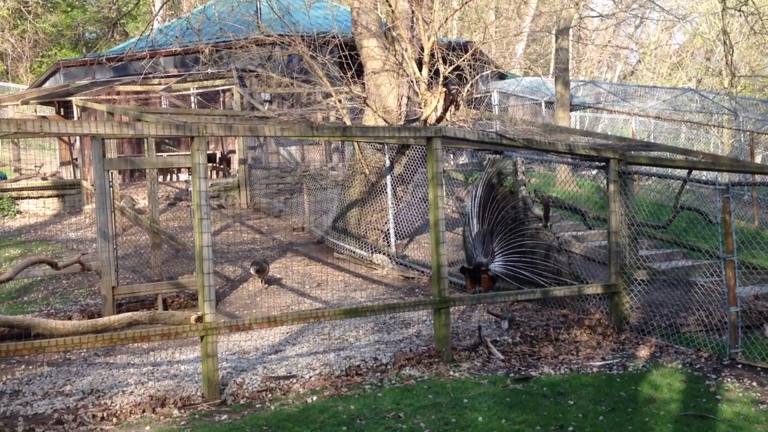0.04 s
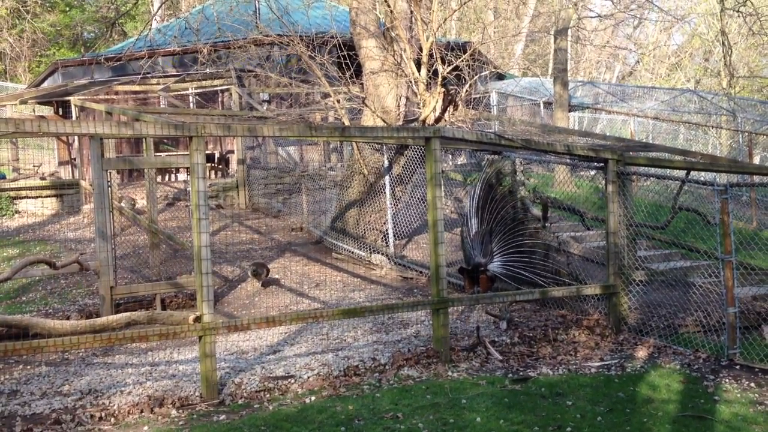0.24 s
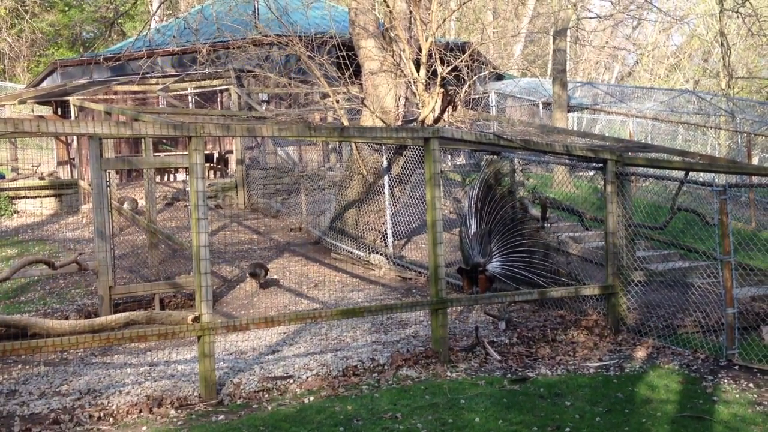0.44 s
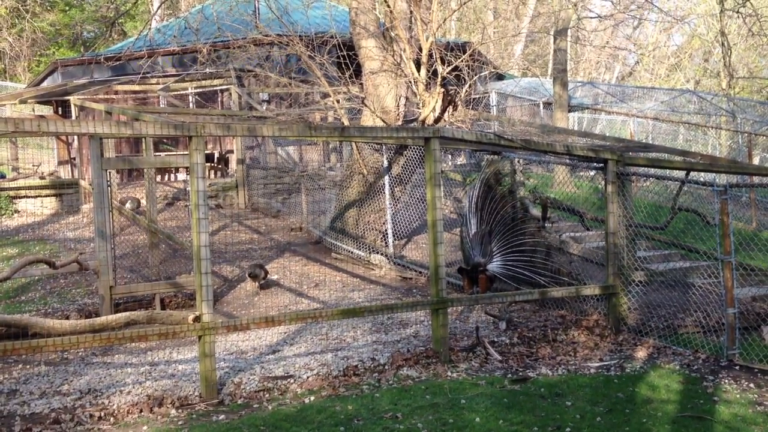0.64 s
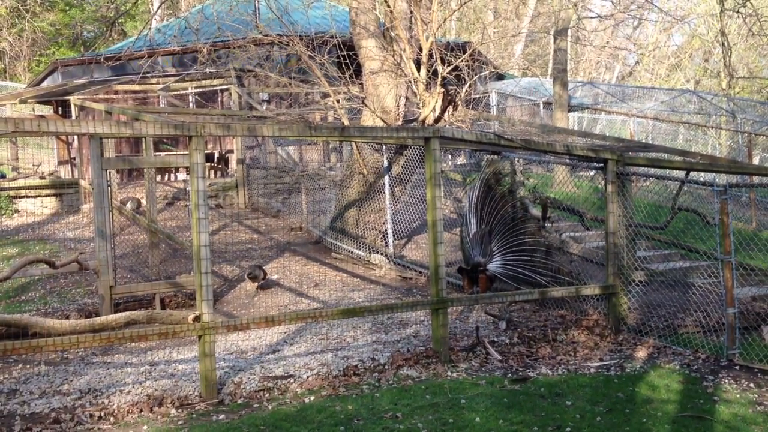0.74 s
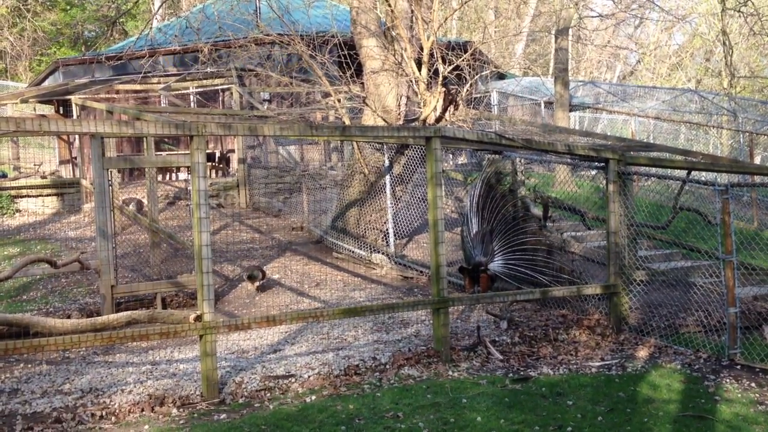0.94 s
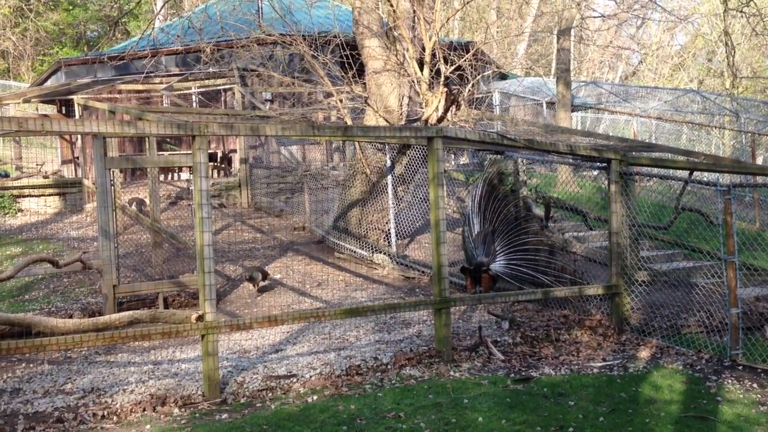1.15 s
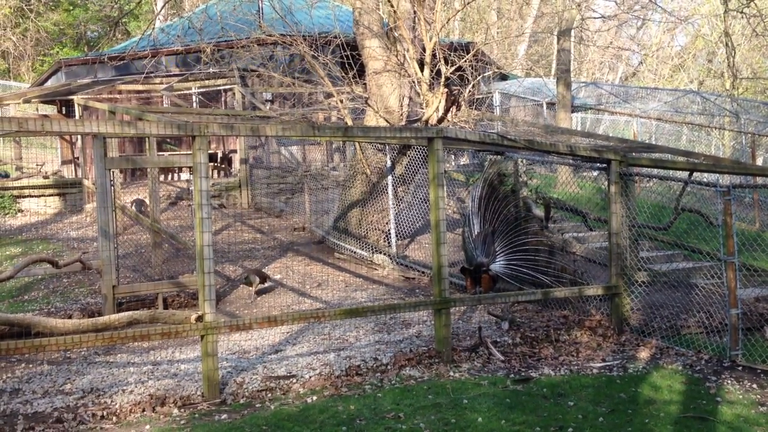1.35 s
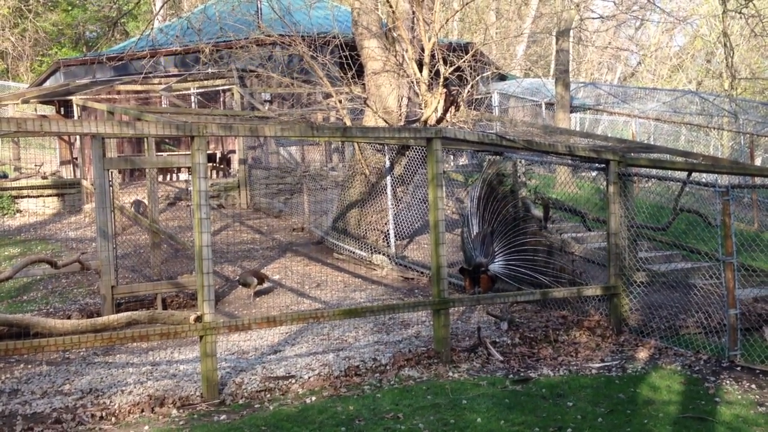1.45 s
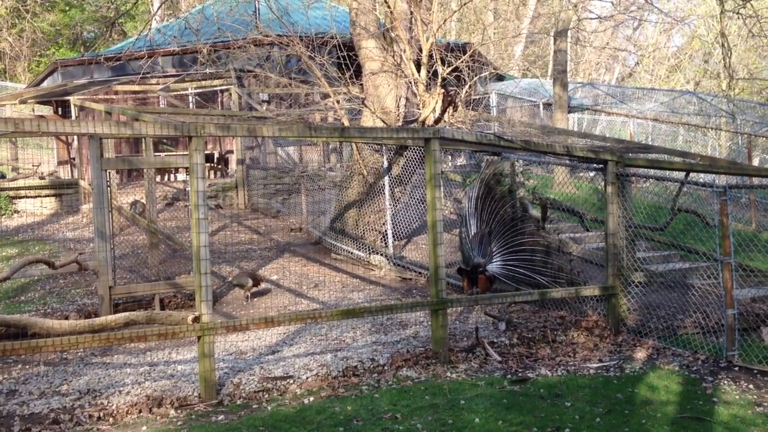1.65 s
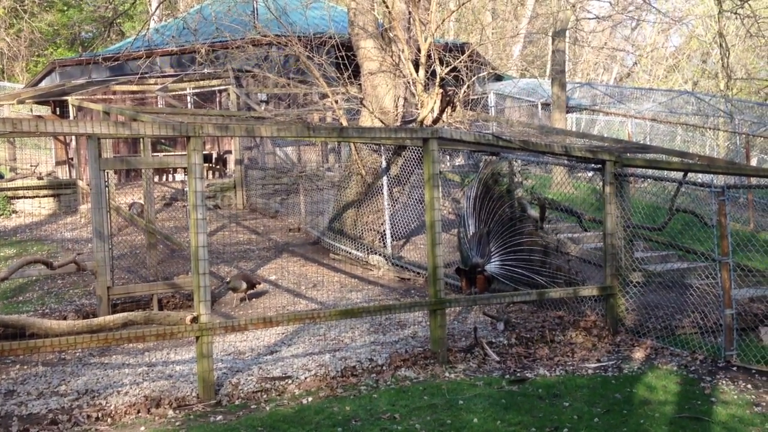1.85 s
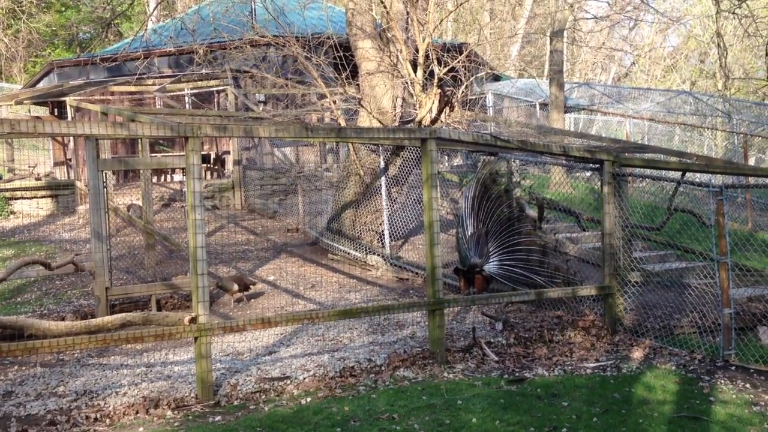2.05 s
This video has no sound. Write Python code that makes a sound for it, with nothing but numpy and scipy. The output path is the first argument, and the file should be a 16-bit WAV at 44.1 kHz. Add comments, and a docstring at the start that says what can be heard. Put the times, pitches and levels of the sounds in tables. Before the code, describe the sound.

A peacock gives one loud, close call while small birds chirp faintly outdoors.

```python
"""An outdoor aviary, one microphone close to a peacock. He gives one loud call: four short croaks,
the first and last faint, a stuttering, raspy rise, then a clear held note that sags and fades, its
harmonics shaped by throat and beak. Farther off, small birds chirp faintly, with a dull tail from
sheds and trees. A soft bump and a few dry ticks sit over the quiet background."""
import sys
import numpy as np
from scipy import signal
from scipy.fft import rfft, irfft
from scipy.io import wavfile
from scipy.ndimage import uniform_filter1d, minimum_filter1d

SR = 44100
rng = np.random.default_rng(int(sys.argv[2]) if len(sys.argv) > 2 else 0)


def wrap_up_sound(samples):
    """Save the sound to the file named by the first command line argument, as 16-bit audio."""
    columns = np.atleast_2d(samples).T
    # keep every value between -1 and 1, then stretch to whole-number steps
    tamed = np.clip(columns, -1, 1)
    steps = np.round(tamed * 32767).astype(np.int16)
    wavfile.write(sys.argv[1], SR, steps)


N = 92786
T = np.arange(N) / SR

# outdoor background: frequency_hz, density_db
BACKGROUND_SPECTRUM = [(25, -34), (45, -27), (70, -10), (120, -2), (180, 0), (260, -3), (400, -7),
                       (700, -7.5), (1100, -11), (1500, -15.5), (2100, -18), (3200, -21), (4600, -19.5),
                       (5600, -25), (7200, -34), (10000, -39), (15000, -34)]
# small birds: start_s, length_s, start_hz, end_hz, level_db
CHIRPS = [(-.015, .075, 5230, 2770, -52), (.215, .045, 4320, 5240, -57), (0.284, .035, 3400, 4500, -59),
          (0.372, .03, 4200, 4730, -63), (.445, .025, 4200, 4700, -63), (0.826, .025, 3800, 5150, -51),
          (0.858, .045, 5180, 4220, -54), (.96, .095, 5100, 3000, -51), (0.989, .06, 4970, 3730, -57),
          (1.155, .04, 3920, 3400, -47), (1.214, .03, 4690, 3880, -49), (2.056, .05, 4507, 3495, -58)]
# a soft bump, then dry ticks: start_s, peak_db, centre_hz, width_hz, decay_s
TICKS = [(.122, -35, 175, 160, .006), (.742, -31.5, 2300, 2000, .0016), (.838, -46, 4800, 3500, .003),
         (.874, -37, 2070, 900, .002), (1.093, -39, 2000, 3200, .002)]
# one harsh falling chirp: time_s, pitch_hz, level_db
HARSH_CHIRP = [(.51, 5100, -66), (.538, 4900, -54), (.55, 4600, -45), (.585, 3900, -46.5),
               (.63, 3500, -43.5), (.66, 3400, -52), (.71, 3350, -64), (.76, 3350, -78)]
# hiss around it: frequency_hz, density_db
CHIRP_HISS = [(2000, -25), (3500, -3), (5200, 0), (6500, -7), (9000, -17), (15000, -22)]
# croaks before the voice catches on: start_s, length_s, level_db, pitch_hz
CROAKS = [(1.129, 0.011, -36.5, 1030), (1.1375, .011, -18, 1065), (1.155, 0.016, -23.5, 1133),
          (1.172, 0.0095, -39, 1053)]
# noise in the croaks: frequency_hz, density_db
CROAK_SPECTRUM = [(60, -38), (180, -9), (600, -9), (1100, 0), (1700, -16), (2500, -11), (3300, -33),
                  (7000, -40), (9500, -37), (14000, -35)]
# the call's rise and sag: time_s, pitch_hz
CALL_PITCH = [(1.175, 418), (1.215, 462), (1.24, 467.9), (1.262, 495), (1.3, 503.6), (1.335, 519.5),
              (1.41, 539), (1.485, 560.4), (1.55, 568.6), (1.62, 570.5), (1.7, 567.5), (1.77, 554),
              (1.825, 525.3), (1.885, 467.4), (1.945, 420)]
# effort behind the call: time_s, gain_db
CALL_EFFORT = [(1.175, -41), (1.182, -22), (1.19, -14), (1.202, -14), (1.215, -7), (1.24, -11), (1.26, -4),
               (1.33, -2.5), (1.42, -1), (1.62, -.5), (1.77, -1.5), (1.82, -5.3), (1.85, -10.5),
               (1.89, -18.5), (1.919, -25), (1.95, -45)]
# treble against the rest of the voice: time_s, gain_db
CALL_TREBLE = [(1.18, -23), (1.26, -17), (1.33, -10), (1.41, -10), (1.5, -2.5), (1.6, -1), (1.76, 0),
               (1.83, -7), (1.9, 0)]
# rasp against the voice: time_s, gain_db
HOARSENESS = [(1.17, -15), (1.21, -22), (1.27, -22), (1.33, -27), (1.4, -30), (1.47, -39), (1.6, -44),
              (1.8, -43), (1.93, -30)]
# catches in the rising voice: time_s, depth_db
CATCHES = [(1.197, 11), (1.208, 6), (1.224, 16), (1.252, 20.5), (1.281, 20), (1.318, 13.5), (1.353, 6),
           (1.391, 4)]
# throat and beak resonances: frequency_hz, gain_db
THROAT = [(400, 2.5), (570, 0), (850, -6), (950, -0.5), (1130, 2), (1300, -9), (1480, -8), (1600, -16),
          (1710, -16.5), (1850, -33), (2080, -18), (2280, -20), (2420, -14), (2630, -13), (2850, -22.5),
          (3100, -39), (3250, -29), (3400, -20), (3700, -27), (4000, -29), (4560, -36), (5130, -21),
          (5700, -9.5), (6270, -8.5), (6840, -22), (7900, -30), (9100, -25), (9700, -29), (10400, -42),
          (11400, -29), (12500, -28), (13100, -38), (13700, -31), (15000, -48)]
# faint tones between the harmonics: frequency_hz, gain_db
UNDERTONES = [(235, -35), (290, -51), (850, -49), (1400, -45), (2000, -58), (2550, -43), (3100, -58)]
# hoarse noise: frequency_hz, density_db
RASP_SPECTRUM = [(25, -52), (90, -48), (200, -15), (330, -26), (480, -6), (750, -7), (1100, 4.5),
                 (1400, -4), (1800, -21), (2300, 1), (2700, -2), (3150, -33), (5200, -38), (7500, -24),
                 (10500, -35), (12500, -29), (15000, -40)]
# air through the open beak: frequency_hz, density_db
BEAK_AIR = [(100, -45), (500, -22), (2000, -12), (3400, -4), (4500, -16), (5600, -0.5), (6500, 2),
            (7500, -14), (10500, -22), (12500, -16), (15000, -23)]
# low hum as the call dies: time_s, pitch_hz, level_db
HUM = [(1.8, 220, -72), (1.86, 231, -49), (1.93, 250, -47), (2.0, 260.7, -44), (2.04, 251, -68.5)]


def from_db(db):
    """Decibels to gain."""
    return 10 ** (np.asarray(db) / 20)


def unit_power(x):
    """Scale to an RMS of one."""
    return x / np.sqrt(np.mean(x ** 2) + 1e-20)


def in_time(rows):
    """Join the rows of a curve by straight lines."""
    times, *columns = np.transpose(rows)
    return [np.interp(T, times, column) for column in columns]


def during(rows):
    """Gate that is open for the length of a curve."""
    return uniform_filter1d(1. * ((T > rows[0][0]) & (T < rows[-1][0])), size=128)


def gain_at(spectrum, hz):
    """Read a spectrum as gain."""
    points_hz, db = np.transpose(spectrum)
    return from_db(np.interp(np.log(hz + 1e-9), np.log(points_hz), db))


def noise(spectrum):
    """Coloured noise of unit power."""
    colour = gain_at(spectrum, np.fft.rfftfreq(N, 1 / SR))
    return unit_power(irfft(rfft(rng.standard_normal(N)) * colour, N))


def drift(hz):
    """Smooth random wander of unit spread."""
    pole = np.exp(-32 * np.pi * hz / SR)
    slow = signal.lfilter([1], [1, -2 * pole, pole ** 2], rng.standard_normal(N // 16 + 1002))[1000:]
    return np.interp(np.arange(N) / 16, np.arange(len(slow)), unit_power(slow))


def background():
    """Quiet, steady outdoor noise, mostly low."""
    return from_db(-54) * noise(BACKGROUND_SPECTRUM)


def small_birds(bend=1.8, warble=.03):
    """Faint warbling glides, some way from the microphone."""
    out = 0
    for start_s, length_s, start_hz, end_hz, db in CHIRPS:
        progress = np.clip((T - start_s) / length_s, 0, 1)
        hz = (start_hz + (end_hz - start_hz) * progress ** bend) * (1 + warble * drift(400))
        out += from_db(db) * np.sin(np.pi * progress ** .6) * np.sin(2 * np.pi * np.cumsum(hz) / SR)
    return out


def yard(sound, t60_s=.52, cutoff_hz=4500):
    """Dull, diffuse tail from sheds and trees."""
    tail = rng.standard_normal(N) * from_db(-60 * T / t60_s) * (T > .012)
    tail = signal.sosfilt(signal.butter(1, cutoff_hz, fs=SR, output="sos"), tail)
    return signal.fftconvolve(sound, tail / np.sqrt(np.sum(tail ** 2)))[:N]


def bump_and_ticks():
    """Quickly dying noise bursts, each twice through one broad resonance."""
    out = 0
    for start_s, db, hz, width_hz, decay_s in TICKS:
        pole = np.exp(-np.pi * width_hz / SR)
        age = np.maximum(T - start_s, 0)
        ring = rng.standard_normal(N) * ((T > start_s) * np.exp(-age / decay_s) + 1e-12)
        for _ in range(2):
            ring = signal.lfilter([1, -1], [1, -2 * pole * np.cos(2 * np.pi * hz / SR), pole ** 2], ring)
        out += from_db(db) * ring / np.abs(ring).max()
    return out


def harsh_chirp(half_width_hz=560, hiss_db=-14):
    """A distant chirp so rough that it is a falling band of noise."""
    hz, db = in_time(HARSH_CHIRP)
    phase = 2 * np.pi * np.cumsum(hz) / SR
    lowpass = signal.butter(3, half_width_hz, fs=SR, output="sos")
    rough = unit_power(signal.sosfilt(lowpass, rng.standard_normal((2, N))))
    band = rough[0] * np.cos(phase) + rough[1] * np.sin(phase)
    return during(HARSH_CHIRP) * from_db(db) * (band + from_db(hiss_db) * noise(CHIRP_HISS))


def croaks(attack_s=.0015, rasp_db=-7):
    """Short hoarse bursts that ring the peacock's main throat resonance."""
    out, rasp = 0, from_db(rasp_db) * noise(CROAK_SPECTRUM)
    for start_s, length_s, db, hz in CROAKS:
        age = np.maximum(T - start_s, 0)
        envelope = (1 - np.exp(-age / attack_s)) * np.exp(-(age / length_s) ** 4)
        out += from_db(db) * envelope * (np.sin(2 * np.pi * hz * age) + rasp)
    return out


def throat_tones(hz, phase, treble_db, on, shelf_hz=4700, fade_from_s=1.825, fade_db_per_s=150):
    """Harmonics glide through fixed throat resonances, with faint undertones between them."""
    hz, phase, treble_db = hz[on], phase[on], treble_db[on]
    fade_db = fade_db_per_s * np.maximum(T[on] - fade_from_s, 0)  # overtones die first as the call sags
    tones = np.zeros(N)
    for k in range(1, 29):
        flicker_db = .9 * np.log(k) * drift(14)[on] * (k > 2)
        knee_db = 18 / (1 + (6.45 / k) ** 40)  # the source pulse is weak above the sixth harmonic
        shelf_db = treble_db / (1 + (shelf_hz / (k * hz)) ** 8)
        gain = gain_at(THROAT, k * hz) * from_db(flicker_db - knee_db - fade_db * (k > 3) + shelf_db)
        tones[on] += gain * np.cos(k * phase - k * k * np.pi / 8)
    for k in np.arange(6) + .5:
        gain = gain_at(UNDERTONES, k * hz) * from_db(3 * drift(9)[on])
        tones[on] += gain * np.cos(k * phase + drift(9)[on])
    return tones


def peacock_call(sag_per_db=.009, shimmer_db=.24):
    """Throat tones, with rasp and beak air pulsing each cycle; every catch dips pitch and level."""
    (hz,), (effort_db,) = in_time(CALL_PITCH), in_time(CALL_EFFORT)
    (treble_db,), (hoarse_db,) = in_time(CALL_TREBLE), in_time(HOARSENESS)
    loss_db, hoarse, voiced = voice_catches(), from_db(hoarse_db), during(CALL_EFFORT)
    jitter = .0025 * drift(70) + .08 * hoarse * drift(250)
    hz = uniform_filter1d(hz, size=800) * (1 - sag_per_db * loss_db + jitter)
    phase = 2 * np.pi * np.cumsum(hz) / SR
    tones = throat_tones(hz, phase, treble_db, on=voiced > 1e-6) * from_db(-loss_db)
    pulsing = 1 + .4 * np.cos(phase)
    rasp = hoarse * noise(RASP_SPECTRUM) * pulsing * from_db(-.24 * loss_db)
    air = from_db(treble_db - 45) * noise(BEAK_AIR) * pulsing
    return voiced * from_db(effort_db + shimmer_db * drift(47)) * (tones + rasp + air)


def voice_catches(close_s=.0065, open_s=.0035):
    """Loss in dB as the voice chokes and springs back."""
    return sum(depth_db * np.exp(-np.abs((T - time_s) / np.where(T < time_s, close_s, open_s)) ** 1.5)
               for time_s, depth_db in CATCHES)


def low_hum():
    """A faint rising tone with a weak octave under the end of the call."""
    hz, db = in_time(HUM)
    phase = 2 * np.pi * np.cumsum(hz) / SR
    return during(HUM) * from_db(db) * (np.sin(phase) + from_db(-11) * np.sin(2 * phase))


def scene():
    """At the microphone: the peacock close and nearly dry, the small birds with more of the yard."""
    peacock = peacock_call() + croaks()
    birds = small_birds() + harsh_chirp()
    tail = yard(from_db(-38) * peacock + from_db(-7) * birds)
    return (peacock + birds + tail + low_hum() + bump_and_ticks() + background())[None]


def record(dry, ceiling_db=-.1, release_db_per_s=9, cutoff_hz=16300):
    """A limiter holds the peaks of the call and lets go slowly; the top is cut."""
    over_db = np.maximum(20 * np.log10(np.abs(dry[0]) + 1e-9) - ceiling_db, 0)
    release_db = release_db_per_s * T
    held_db = np.maximum.accumulate(over_db + release_db) - release_db
    gain_db = uniform_filter1d(minimum_filter1d(-held_db, size=129), size=129)
    lowpass = signal.cheby2(12, 70, cutoff_hz, fs=SR, output="sos")
    return signal.sosfilt(lowpass, dry * from_db(gain_db))


dry = scene()
out = record(dry)
wrap_up_sound(out)
```